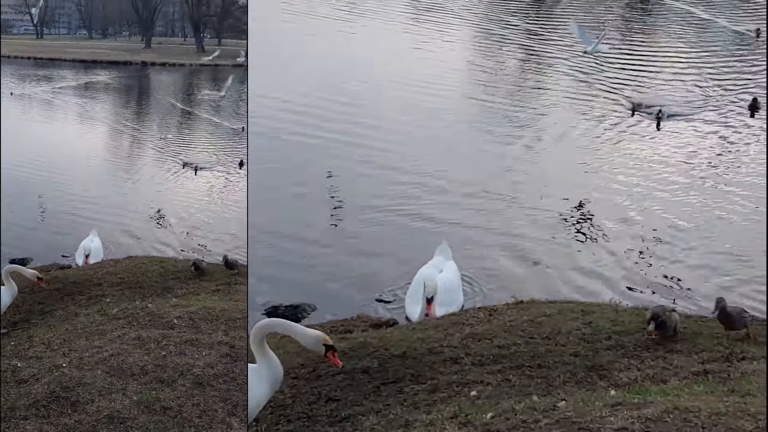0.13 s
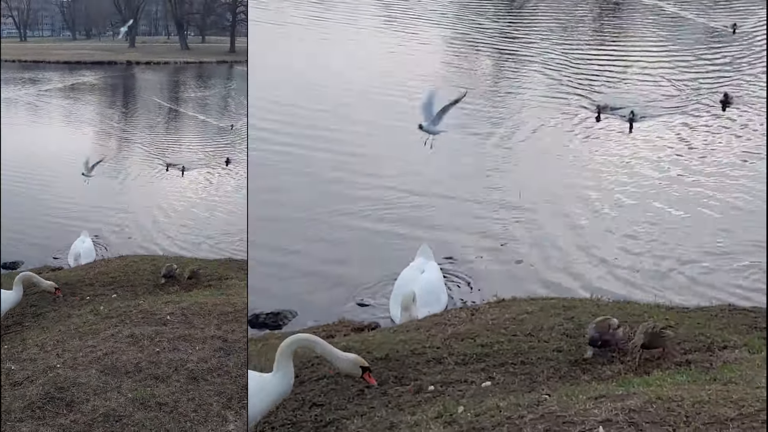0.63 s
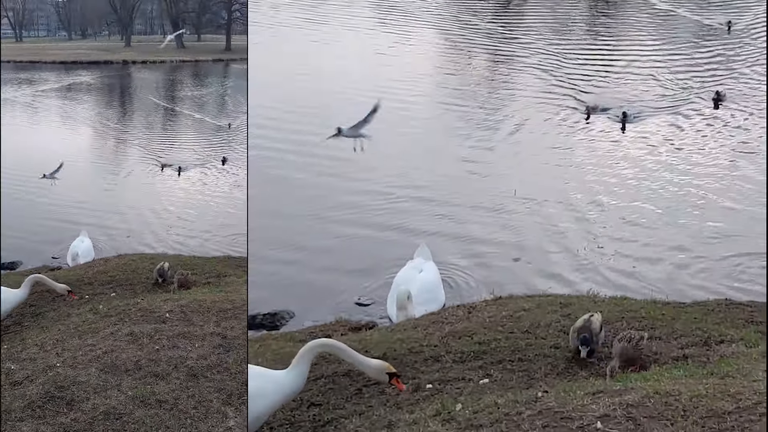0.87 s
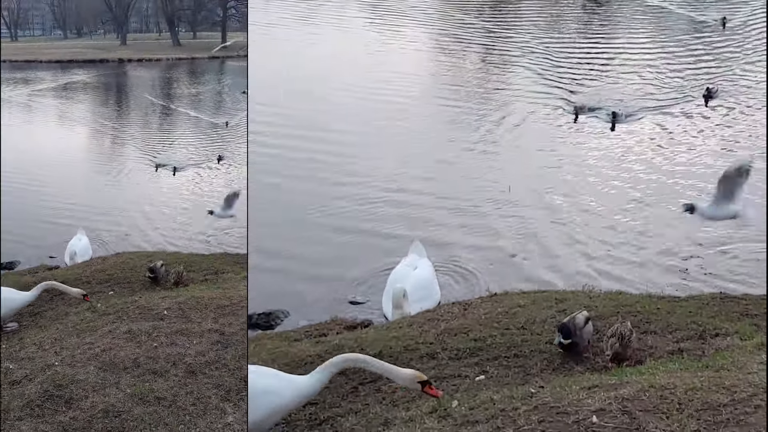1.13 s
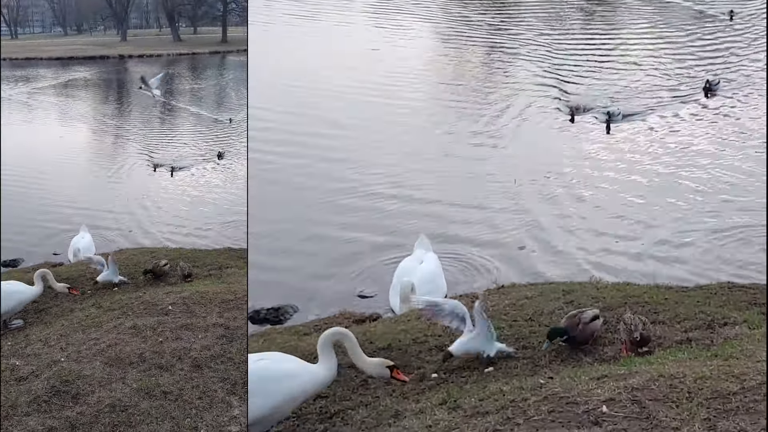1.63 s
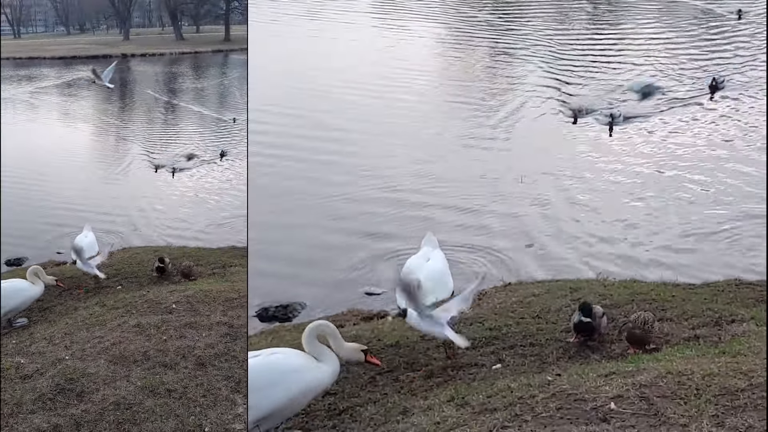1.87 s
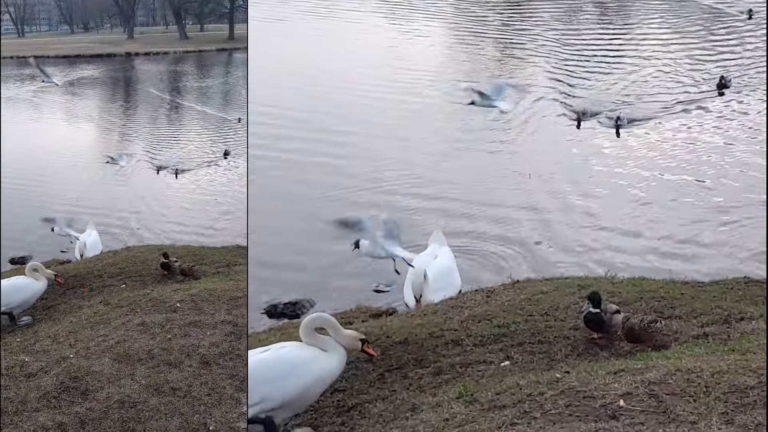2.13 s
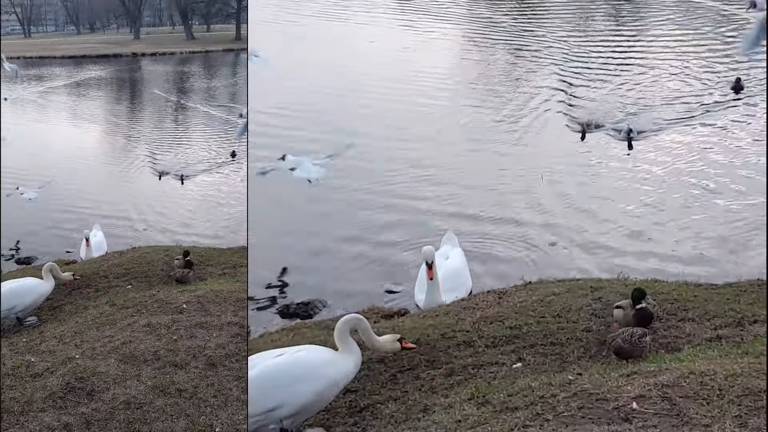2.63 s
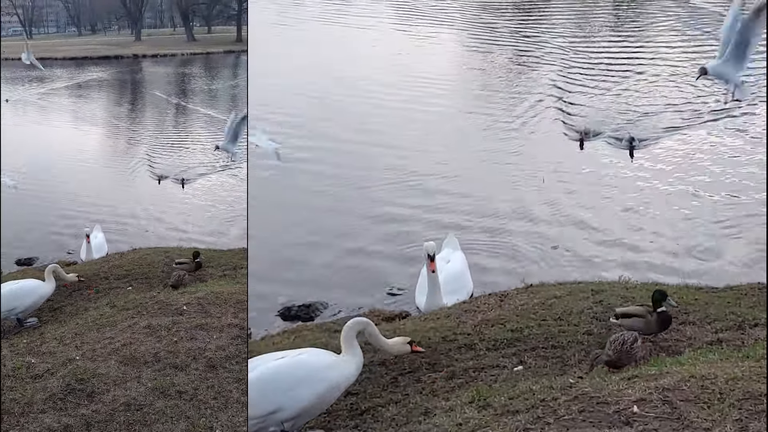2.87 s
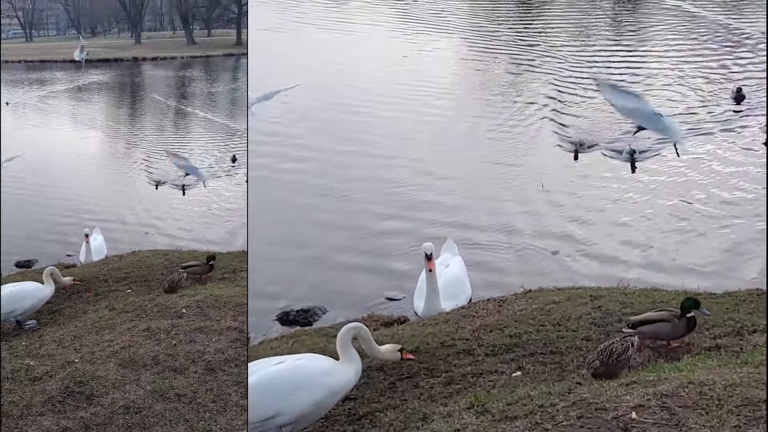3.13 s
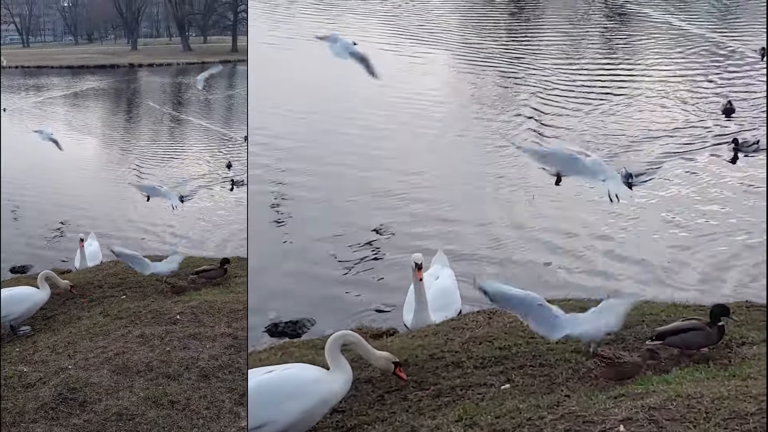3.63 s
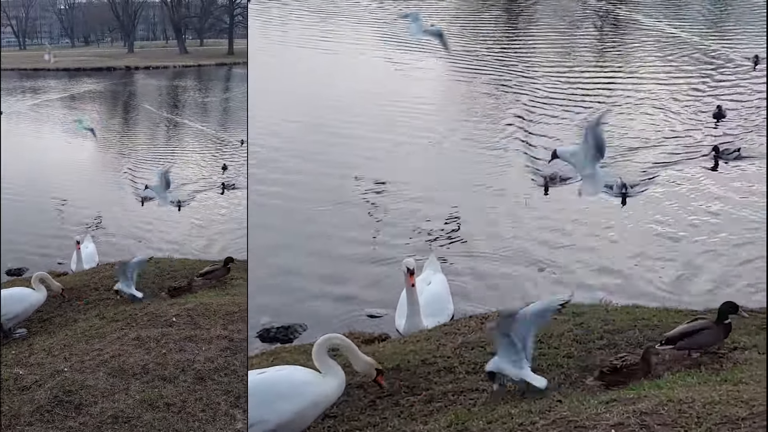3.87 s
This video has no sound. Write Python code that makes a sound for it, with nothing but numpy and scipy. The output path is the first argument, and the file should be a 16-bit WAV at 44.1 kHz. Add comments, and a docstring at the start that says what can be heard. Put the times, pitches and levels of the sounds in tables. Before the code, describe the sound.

Gulls at a pond bank: faint croaks and light rustle at the start, a throbbing harsh scream at 0.4-0.7 s, hoarse yelps from 1.1, another scream at 1.3-1.55. Sparse short croaks follow, moving overhead after 1.9, with wing rustle swelling near 2.2. Rustle peaks around 3.5 with sharp keks; a closer rapid burst comes at 3.75-3.86, then a last croak. Distant traffic rumbles steadily; phone stereo.

```python
"""Faint croaks and a light rustle come first; then gulls scream, croak and yelp over a pond bank.
Most call far off or overhead; sharp syllables come near the end, first overhead, then close by.
Each call but the whistled notes is voice pulses and breath noise, shaped by the throat.
Wings and feathers are hiss, ticks and snaps of noise; distant traffic is a steady low rumble.
A phone's two microphone ports hear it all, with echoes of the calls."""
import sys
import numpy as np
from scipy import signal
from scipy.fft import rfft, irfft, next_fast_len
from scipy.io import wavfile
from scipy.ndimage import uniform_filter1d

SR = 44100
rng = np.random.default_rng(int(sys.argv[2]) if len(sys.argv) > 2 else 0)


def gain_from_db(level_db):
    """Convert decibel levels to linear amplitude factors (20 dB per decade)."""
    decades = np.asarray(level_db, float) / 20
    return 10 ** decades


def waveform_to_disk(signal):
    """Save audio, clipped to [-1, 1], as 16-bit WAV at the path in sys.argv[1]."""
    frames = np.transpose(np.atleast_2d(signal))
    scaled = np.clip(frames, -1, 1) * 32767
    samples = np.round(scaled).astype(np.int16)
    wavfile.write(sys.argv[1], SR, samples)


N = 176400  # samples, four seconds

# throat resonances of croaks and yelps, before mouth() moves them: (pitch_hz, gain_db)
CROAK_THROAT = [(1100, -6.5), (1750, 8.5), (2300, -1), (3200, -14.5), (5000, -31)]
CROAK_TRILL_HZ = 86  # throbs per second in croaks and yelps


def scream(start, top, end, top_hz, db, flat, sub):
    """A drawn-out call: pitch arches up and down under a light throb."""
    rise_share, fall_share = 0.36, 0.46  # how far below the top pitch it starts and ends
    swell_s, stop_s = 0.029, 0.029
    # throat resonances: (pitch_hz, gain_db)
    scream_throat = [(1000, -11), (1550, -2), (1750, 7), (1950, 1.5), (2200, 8.5), (2700, -1.5), (3300, -8),
                     (4300, -6), (4800, -15), (5400, -4.5), (6800, -24)]
    t = np.arange(start, end, 1 / SR)
    rise = rise_share * (abs(top - t) / (top - start)) ** flat
    fall = fall_share * ((t - top) / (end - top)) ** 2
    drop = np.where(t < top, rise, fall)
    edge = np.clip(np.minimum((t - start) / swell_s, (end - t) / stop_s), 0, 1)
    sound = voice(top_hz * (1 - drop), np.clip(sub, 0, 1), rough=0.2, throat=scream_throat)
    return start, edge * gain_from_db(db) * throb(t, rate_hz=85, depth=0.4) * sound


def croak(start, length, db, hz):
    """A short rattling call whose pitch rises and falls slightly; louder ones are brighter."""
    t = np.arange(0, length, 1 / SR)
    arch = np.sin(np.pi * t / length)
    throat = mouth(max(hz / 860, 1), db)
    pitch_hz = hz * (1 - 0.1 * (1 - arch))  # starts and ends 10 % lower
    sound = voice(pitch_hz, sub=0.71, rough=0.27, throat=throat)
    return start, gain_from_db(db) * arch ** 0.5 * throb(t, CROAK_TRILL_HZ, depth=0.75) * sound


def yelp(start, length, db, first_hz, middle_hz, last_hz, mouth_hz):
    """A voiced note whose pitch bends smoothly through three values; longer ones are hoarser."""
    all_noise_s = 0.6  # a yelp this long would be all noise
    t = np.arange(0, length, 1 / SR)
    bend = np.polyfit([0, length / 2, length], [first_hz, middle_hz, last_hz], 2)
    throat = mouth(mouth_hz / CROAK_THROAT[1][0], db)
    rough = np.sqrt(length / all_noise_s)
    sound = voice(np.polyval(bend, t), rough, rough, throat)
    arch = np.sin(np.pi * t / length)
    return start, gain_from_db(db) * arch ** 0.5 * throb(t, CROAK_TRILL_HZ, depth=0.4) * sound


def kek(start, length, db, hz):
    """A sharp pulse run that starts at half rate and stops short; weak ones are hoarse."""
    start_s = 0.006  # time spent leaving the half rate
    # throat resonances: (pitch_hz, gain_db)
    kek_throat = [(1050, -16), (2100, 0.5), (3200, -1), (4200, -1.5), (5300, -4.5), (7300, -22.5),
                  (12000, -15.5)]
    t = np.arange(0, length, 1 / SR)
    rough = np.clip(0.09 * (-22 - db), 0.14, 0.7)  # more noise for each dB below -22
    sub = np.clip(2 - 2 * t / start_s, rough, 1)
    swell = np.minimum(0.047 + 0.64 * t / start_s, 1)
    stop = np.clip((length - t) / 0.0025, 0, 1)
    pitch_hz = hz * (1 - 0.06 * (t / length) ** 2)  # sags by 6 %
    return start, gain_from_db(db) * swell * stop * voice(pitch_hz, sub, rough, kek_throat)


def peep(start, length, db, top_hz, arch):
    """A small whistled note: a near-sine whose pitch peaks early and falls."""
    u = np.arange(0, length, 1 / SR) / length
    hz = top_hz * (1 - arch * ((u - 0.35) / 0.65) ** 2)
    return start, gain_from_db(db) * np.sin(np.pi * u) ** 0.5 * np.sin(2 * np.pi * np.cumsum(hz) / SR)


def voice(hz, sub, rough, throat):
    """Jittered pulses, every other one weaker, with a puff of noise each cycle, through the throat."""
    break_db = 15  # wander of single partials in a fully rough voice
    jitter, breath = rng.standard_normal((2, len(hz)))
    jitter = evened(uniform_filter1d(jitter, 60))
    turns = np.cumsum(hz * (1 + 0.093 * rough * jitter)) / SR
    order = np.arange(1, 60)[:, None] / 2  # partials at every half multiple of the pitch
    steps = rng.standard_normal((len(order), len(hz) // 400 + 2))
    steps = steps.repeat(400, 1)[:, :len(hz)]
    broken = gain_from_db(break_db * rough * uniform_filter1d(steps, 300, 1))  # each partial comes and goes
    weight = np.where(order % 1, sub, 1) * (order * hz < SR / 3)
    folds = (broken * weight * np.cos(2 * np.pi * order * turns)).sum(0)
    puffs = (0.1 + np.exp(-(turns % 1) / 0.6)) * breath
    rough = np.clip(rough, 0, 1)
    return evened(colour((1 - rough) * evened(folds) + rough * evened(puffs), throat))


def throb(t, rate_hz, depth):
    """The voice swells and sinks many times a second."""
    return evened(1 - depth + depth * np.sin(np.pi * rate_hz * t) ** 2 * 2)


def mouth(scale, db):
    """The croak throat moved in pitch; louder calls are brighter."""
    bright_db = 2.08  # treble gained for each dB of level
    return [(f * scale, g + bright_db * (db + 42.5) * (f > 3000)) for f, g in CROAK_THROAT]


def wings():
    """Air hiss through feathers, random ticks among it and a few clear snaps."""
    ticks_per_s, spread_db, tick_share = 200, 4, 0.28  # the share is of power
    # rise and fall of the rustle: (time_s, level_db)
    rustle = [(0, -46), (.15, -58), (1.05, -57), (1.5, -51.5), (1.97, -48), (2.04, -55.5), (2.2, -41.5),
              (2.7, -48), (3.29, -45), (3.34, -39.5), (3.47, -31.5), (3.62, -49), (3.73, -40), (4, -54)]
    # tone of the rustle: (pitch_hz, gain_db)
    rustle_colour = [(1000, -6), (3000, -5), (12000, -7.5)]
    # feather snaps, level before their own tone filter: (start_s, peak_db)
    snap_list = [(0.37, -59), (1.985, -59.5)]
    t = np.arange(N) / SR
    size = gain_from_db(spread_db * np.minimum(rng.exponential(1, N), 3))
    size = size * (rng.random(N) < ticks_per_s / SR)
    burst = signal.oaconvolve(size, gain_from_db(-60 * t[:600] / 0.0097))[:N]  # each tick dies away
    hiss, tick = rng.standard_normal((2, 2, N))
    share = np.clip(tick_share, 0, 1)
    blend = np.sqrt(1 - share) * hiss + np.sqrt(share) * evened(burst * tick)
    out = evened(colour(blend, rustle_colour))
    snaps = np.zeros(N)
    for s, db in snap_list:
        add(snaps, s, gain_from_db(db - 60 * t[:900] / 0.1))
    snaps = colour(snaps * tick, [(1200, -22), (3500, 22.5), (12000, 16.5)])
    return out * gain_from_db(np.interp(t, *np.transpose(rustle))) + snaps


def traffic():
    """Distant traffic: steady rumble of shaped noise with faint drifting patches."""
    # tone of the rumble: (pitch_hz, level_db per Hz, relative)
    rumble = [(15, -45), (25, 2), (82, 1), (230, -10), (292, -17), (723, -15), (2440, -25), (7500, -66.5),
              (9750, -83)]
    # how alike left and right are: (pitch_hz, likeness from 0 to 1)
    likeness = [(35, .7), (150, .97), (800, .72), (3500, .15)]
    hz = np.fft.rfftfreq(2048, 1 / SR)
    a, b, c, d, patches = rng.standard_normal((N // 512 + 5, 1025, 5)).T
    patches = uniform_filter1d(patches, 12, 0)  # smooth over pitch, then over time
    patches = evened(uniform_filter1d(patches, 10, 1))
    same = np.clip(read(likeness, hz), -1, 1)[:, None]
    left = a + 1j * b
    right = same * left + np.sqrt(1 - same ** 2) * (c + 1j * d)
    z = np.array([left, right]) * gain_from_db(read(rumble, hz)[:, None] + 1.92 * patches)
    return gain_from_db(-36.5) * evened(signal.istft(z, nperseg=2048, noverlap=1536)[1][:, :N])


def ports(x, share, lead_us, echo_db):
    """Two ports hear a source with their own colour and delay, plus echoes off water and trees."""
    lead_from_hz, echo_t60_s = 1155, 0.34  # the ports agree in phase below this pitch
    # colour of a source off to one side: (pitch_hz, left minus right_db)
    side_colour = [(700, 1), (1700, -7), (4000, 1), (9000, 7)]
    hz = np.fft.rfftfreq(N, 1 / SR)
    turn = np.pi * np.maximum(hz - lead_from_hz, 0) * lead_us / 10 ** 6
    half = gain_from_db(share * read(side_colour, hz) / 2) * np.exp(1j * turn)  # half the difference per port
    t = np.arange(SR // 2) / SR
    taps = rng.standard_normal((2, len(t))) * (rng.random((2, len(t))) < 0.05)  # sparse echoes
    taps = taps * gain_from_db(-60 * t / echo_t60_s) * (t > 0)
    echo = signal.fftconvolve(x[None], taps / np.linalg.norm(taps[0]), axes=1)[:, :N]
    return irfft(np.array([half, 1 / half]) * rfft(x + gain_from_db(echo_db) * echo), N)


def evened(x):
    """Scales a sound to an rms of one."""
    return x / np.sqrt(np.mean(x ** 2) + 1e-20)


def read(points, hz):
    """Reads a curve between its points, on a log pitch scale."""
    f, value = np.transpose(points)
    return np.interp(np.log(hz + 1), np.log(f + 1), value)


def add(mix, s, sound):
    """Adds a sound to the mix from time s, in seconds."""
    part = mix[round(s * SR):][:len(sound)]
    part += sound[:len(part)]


def colour(x, points):
    """Causal (minimum-phase) filter from a (pitch_hz, gain_db) curve."""
    length = x.shape[-1]
    size = 2 * next_fast_len(length // 2 + 1024)
    log_gain = np.log(gain_from_db(read(points, abs(np.fft.fftfreq(size, 1 / SR)))))
    response = np.exp(np.conj(signal.hilbert(log_gain)))[:size // 2 + 1]
    return irfft(rfft(x, size) * response, size)[..., :length]


def scene():
    """Places each call far off, overhead or close, then adds wings and traffic."""
    overhead_from_s, close_from_s = 1.9, 3.7
    # call levels hold before the call's own swell and the ports
    # screams: (start_s, top_s, end_s, top_hz, level_db, flatness of the top, half-pitch share)
    screams = [(.43, 0.573, .675, 886.7, -30, 2.4, 0.57), (1.32, 1.466, 1.55, 896, -30.5, 1.6, 0.32)]
    # croaks: (start_s, length_s, level_db, top pitch_hz)
    croaks = [(0, 0.061, -43.5, 817), (0.053, 0.069, -48, 764), (0.26, 0.079, -41.5, 870),
              (0.386, 0.059, -36, 747), (0.755, 0.095, -38, 877), (1.751, 0.079, -40.5, 890),
              (1.929, 0.053, -44.5, 1157), (2.173, 0.066, -39.5, 833), (2.47, 0.09, -41, 849),
              (2.746, 0.08, -44, 1137), (3.135, 0.02, -36.5, 851), (3.223, 0.039, -34.5, 626),
              (3.961, .07, -33, 789)]
    # yelps: (start_s, length_s, level_db, first_hz, middle_hz, last_hz, mouth resonance_hz)
    yelps = [(1.105, .16, -37.5, 626.4, 661, 717, 1403), (1.211, 0.15, -37, 701, 835, 802, 1750),
             (2.737, 0.036, -42.5, 953, 890, 840, 1750), (2.836, 0.068, -35, 501, 616, 563, 1820),
             (3.096, 0.033, -43.5, 973, 855, 820, 1780), (3.157, 0.027, -41, 785, 944, 745, 1760),
             (3.455, .046, -29, 693, 716, 695, 2000)]
    # whistled notes: (start_s, length_s, level_db, top_hz, arch share)
    peeps = [(.15, .043, -54, 4100, .17), (.852, .04, -43, 930, .02)]
    # sharp syllables, the first three from overhead, the rest from a gull close by:
    # (start_s, length_s, level_db, pitch_hz before the sag)
    keks = [(3.494, 0.022, -19, 1099), (3.522, 0.017, -22.5, 1043), (3.549, .011, -30, 1020),
            (3.75, 0.023, -22.5, 1037), (3.775, 0.02, -19, 1064), (3.797, 0.018, -17.5, 1081),
            (3.821, 0.019, -18.5, 1043), (3.841, 0.02, -27, 952)]
    far, overhead, close = np.zeros((3, N))
    for row in screams:
        add(far, *scream(*row))
    for row in croaks:
        add(far if row[0] < overhead_from_s else overhead, *croak(*row))
    for row in yelps:
        add(far if row[0] < overhead_from_s else overhead, *yelp(*row))
    for row in peeps:
        add(overhead, *peep(*row))
    for row in keks:
        add(overhead if row[0] < close_from_s else close, *kek(*row))
    calls = ports(far, share=1.12, lead_us=266, echo_db=-4.5)
    calls += ports(overhead, share=1, lead_us=70.6, echo_db=-13)
    calls += ports(close, share=1, lead_us=156, echo_db=-13)
    return calls + traffic() + wings()


def band_limit(x):
    """A steep low-pass at the top of the band."""
    return signal.sosfilt(signal.butter(12, 15250, fs=SR, output="sos"), x)


def record(dry):
    """The microphone ports have a deep notch in the treble."""
    # tone of the ports: (pitch_hz, gain_db)
    port_colour = [(5800, 2), (7400, 4), (8100, -22.5), (8800, -25.5), (10000, -11.5), (11800, -10.5),
                   (15000, -48)]
    return band_limit(colour(dry, port_colour))


dry = scene()
out = record(dry)
waveform_to_disk(out)
```